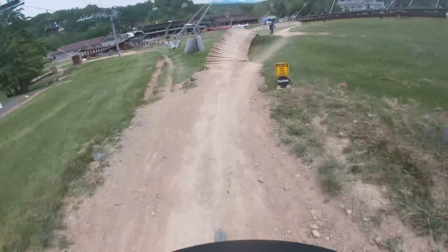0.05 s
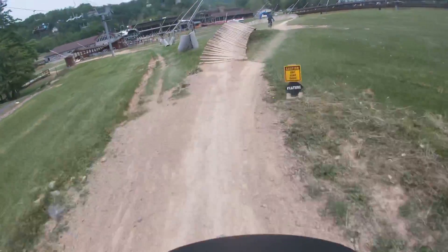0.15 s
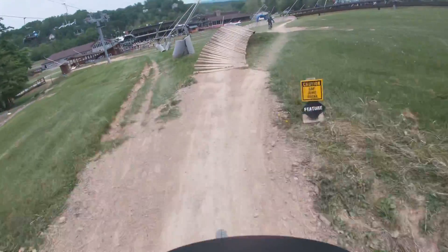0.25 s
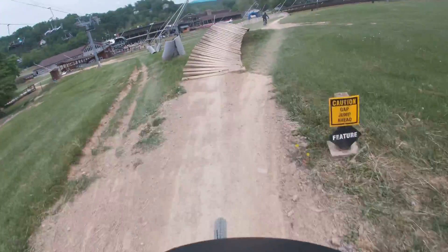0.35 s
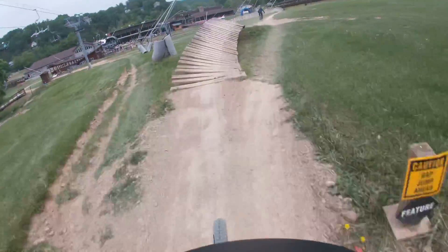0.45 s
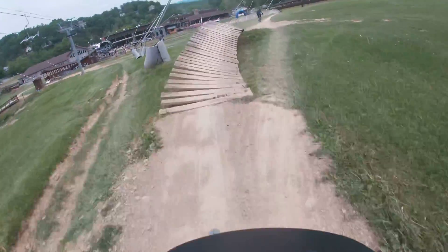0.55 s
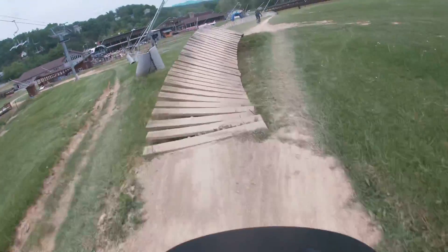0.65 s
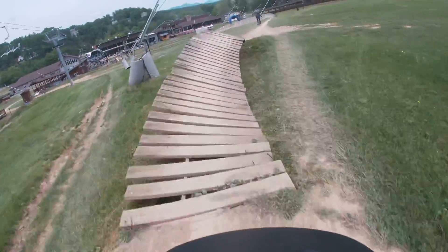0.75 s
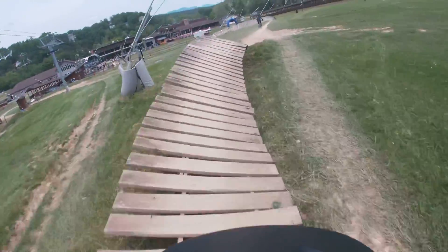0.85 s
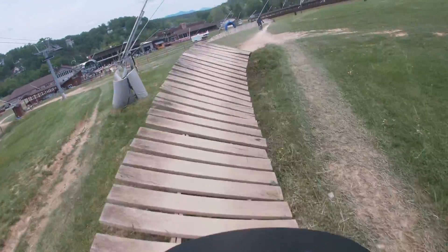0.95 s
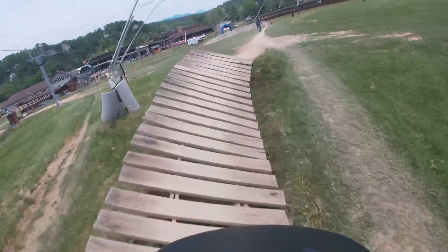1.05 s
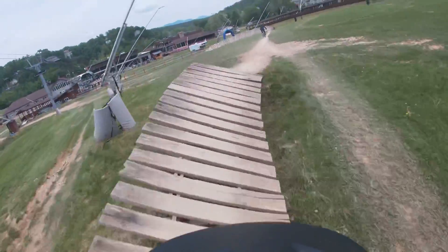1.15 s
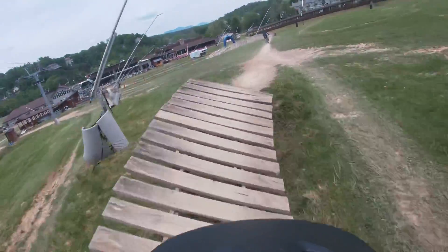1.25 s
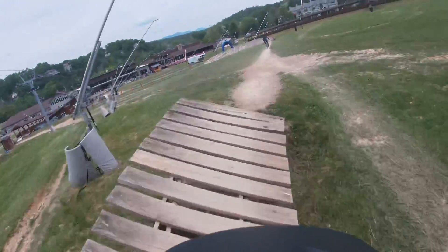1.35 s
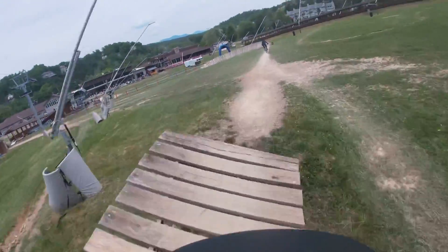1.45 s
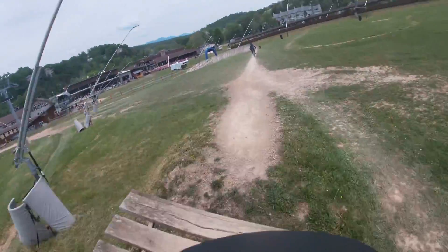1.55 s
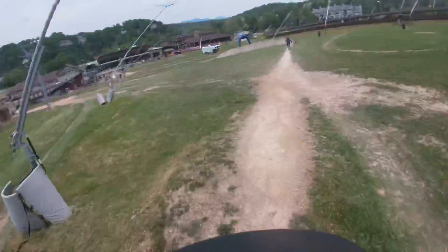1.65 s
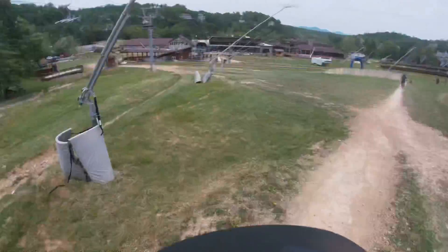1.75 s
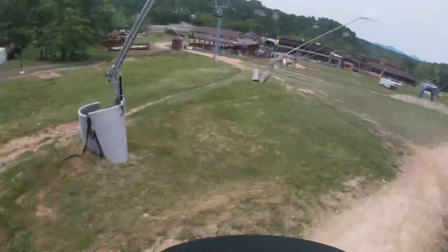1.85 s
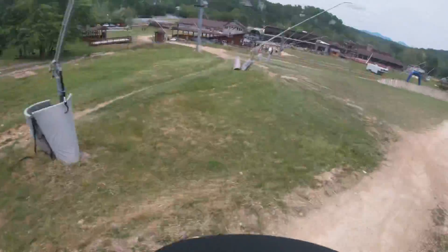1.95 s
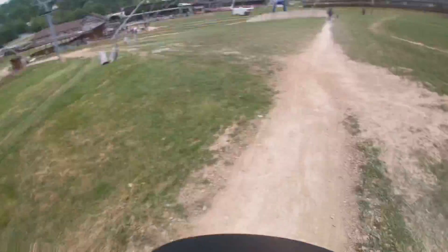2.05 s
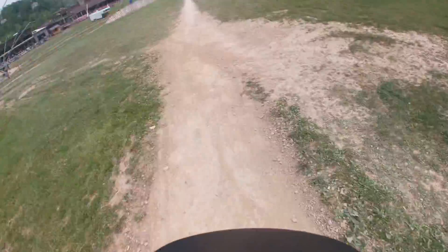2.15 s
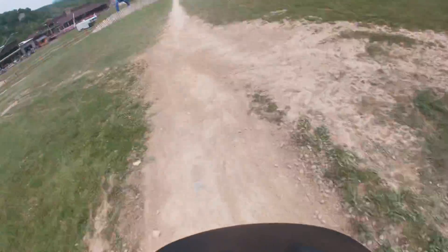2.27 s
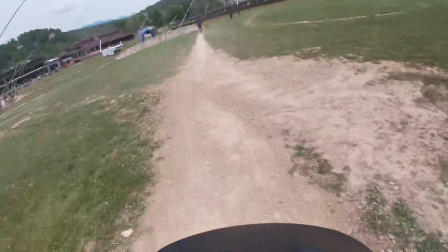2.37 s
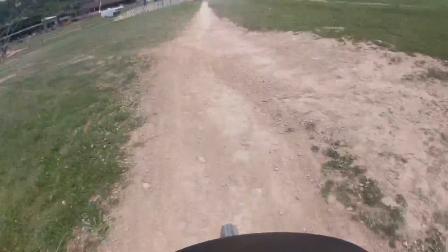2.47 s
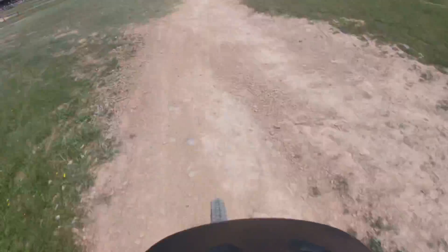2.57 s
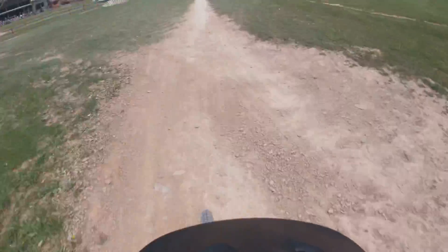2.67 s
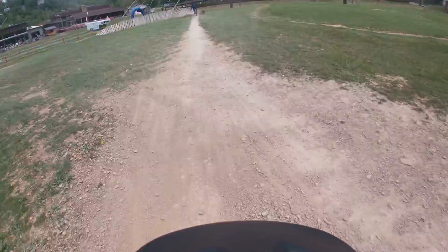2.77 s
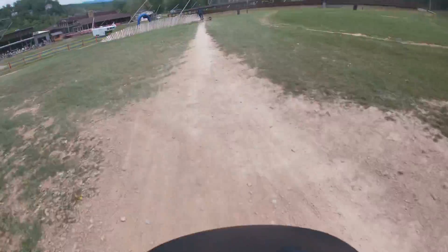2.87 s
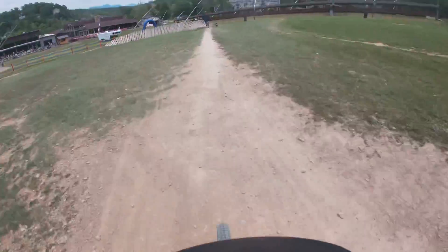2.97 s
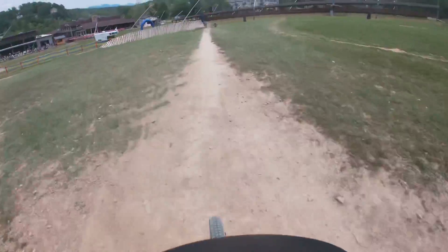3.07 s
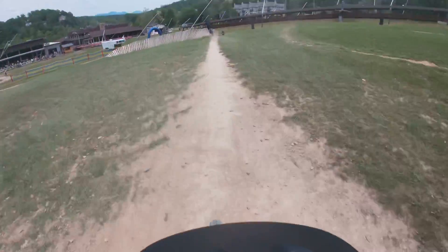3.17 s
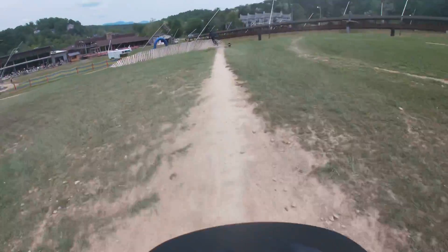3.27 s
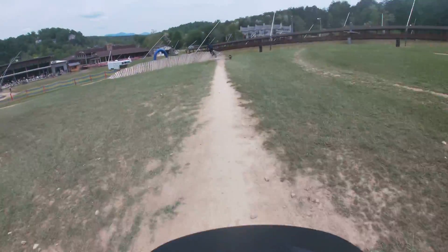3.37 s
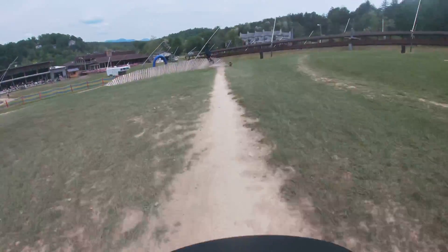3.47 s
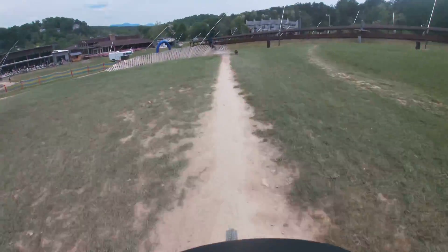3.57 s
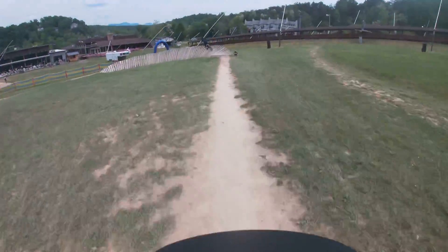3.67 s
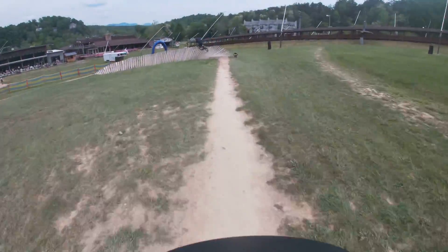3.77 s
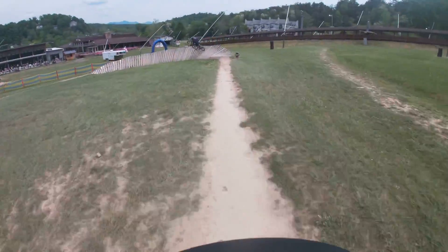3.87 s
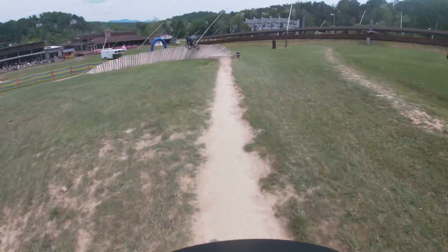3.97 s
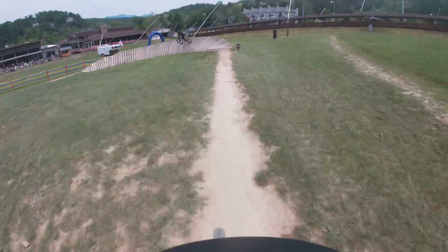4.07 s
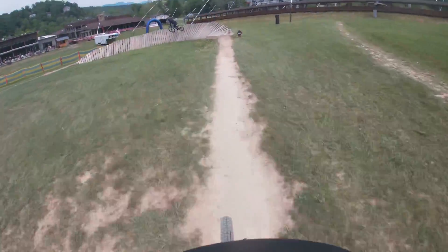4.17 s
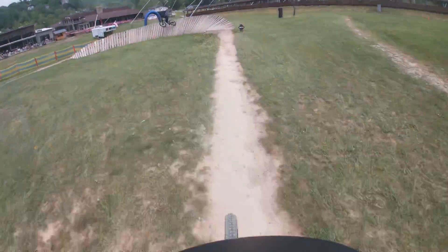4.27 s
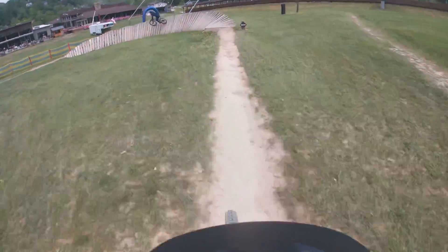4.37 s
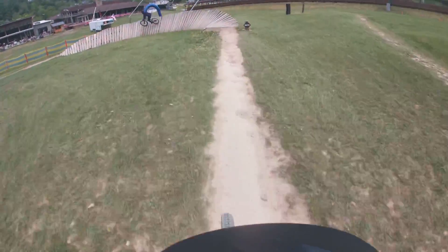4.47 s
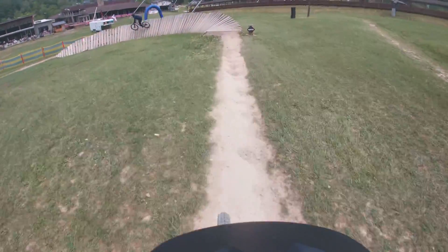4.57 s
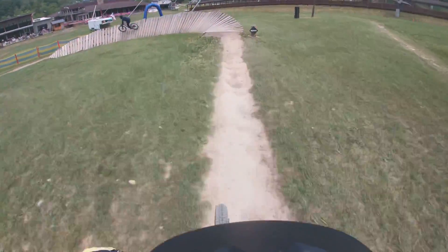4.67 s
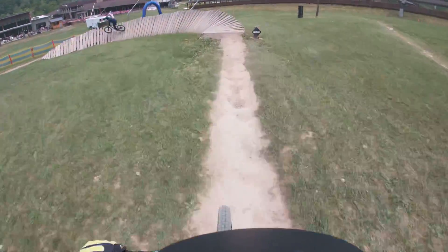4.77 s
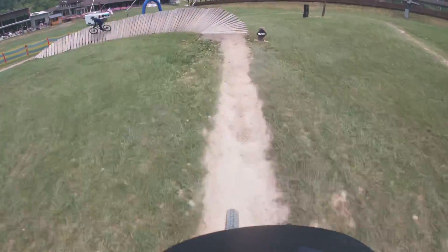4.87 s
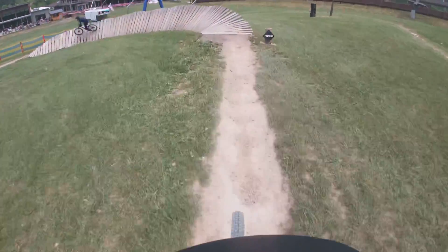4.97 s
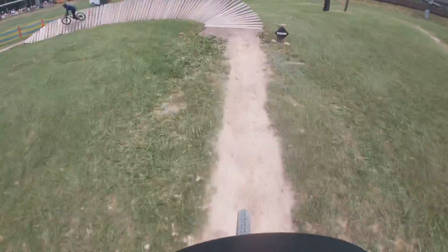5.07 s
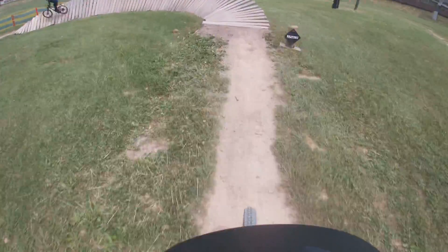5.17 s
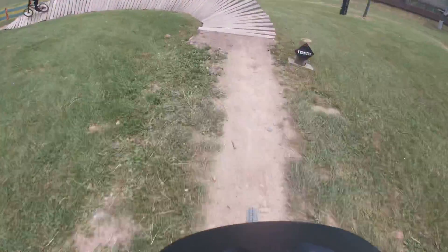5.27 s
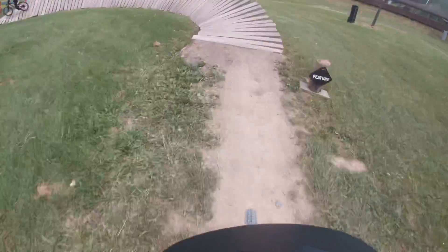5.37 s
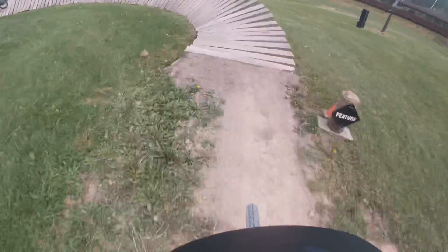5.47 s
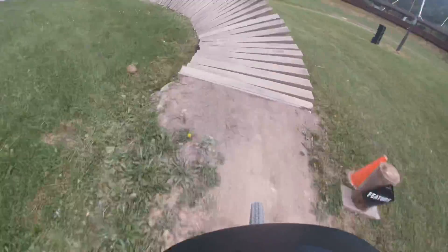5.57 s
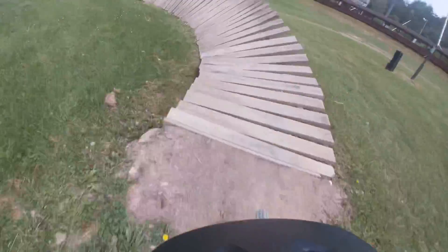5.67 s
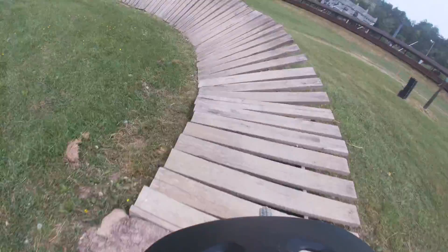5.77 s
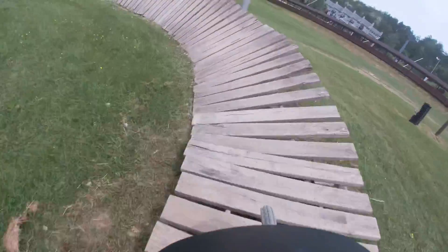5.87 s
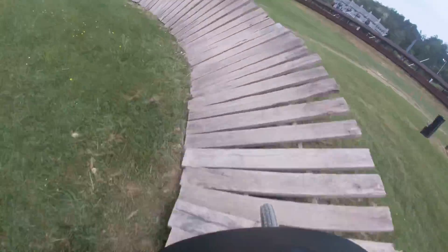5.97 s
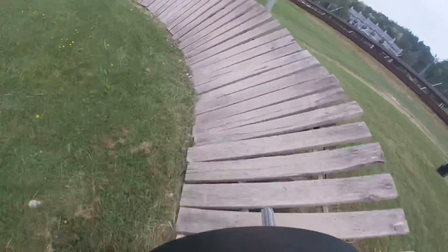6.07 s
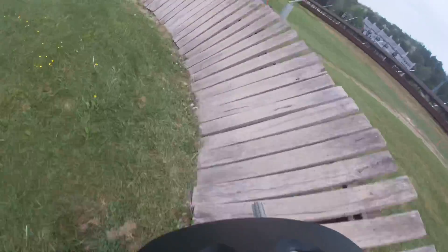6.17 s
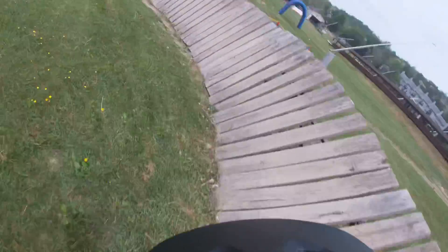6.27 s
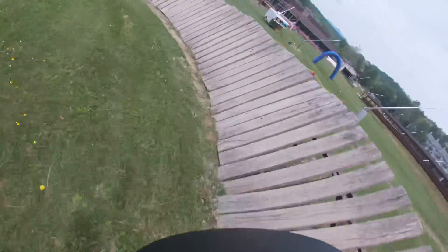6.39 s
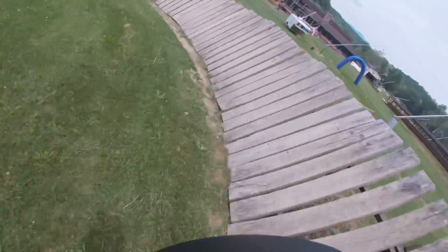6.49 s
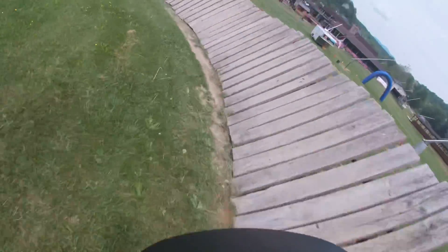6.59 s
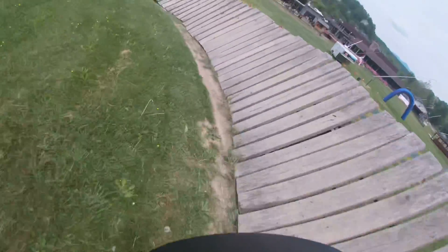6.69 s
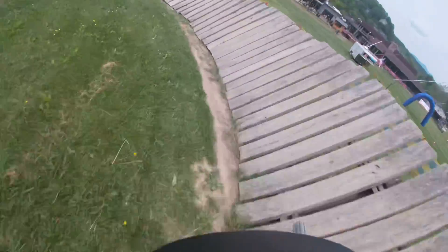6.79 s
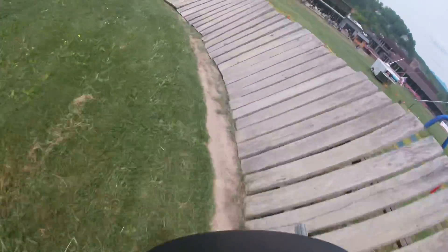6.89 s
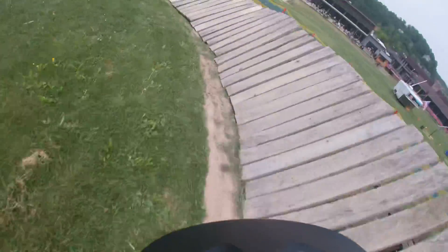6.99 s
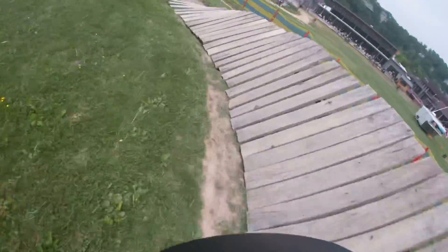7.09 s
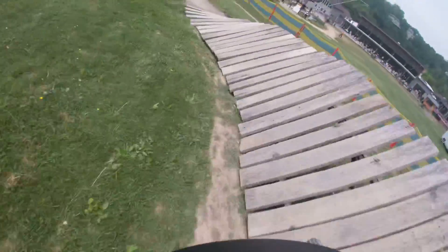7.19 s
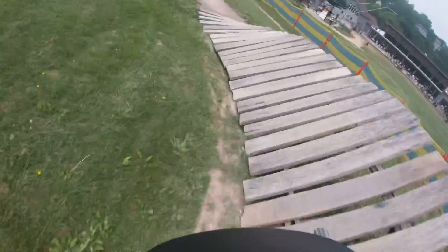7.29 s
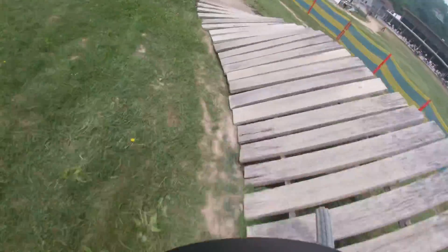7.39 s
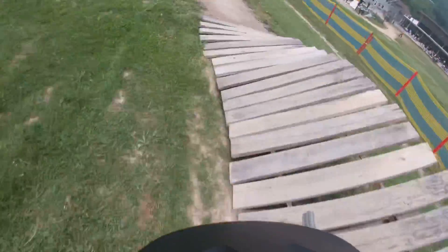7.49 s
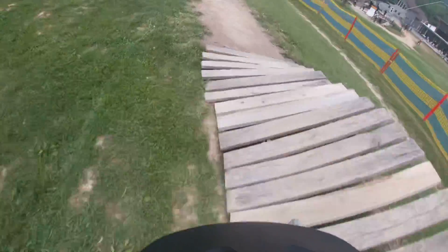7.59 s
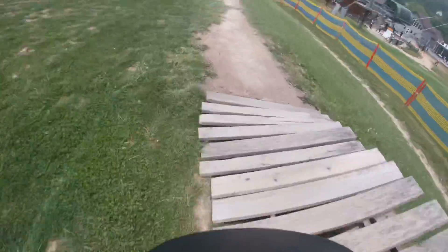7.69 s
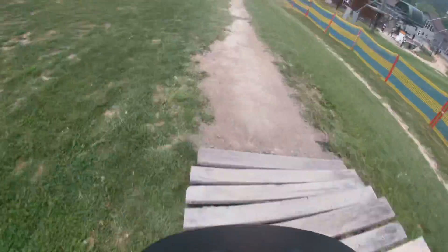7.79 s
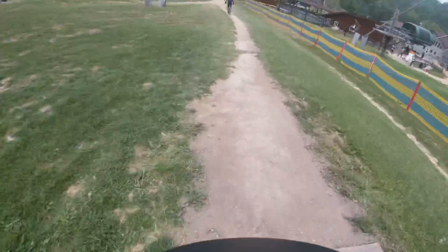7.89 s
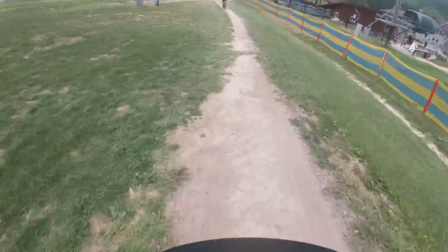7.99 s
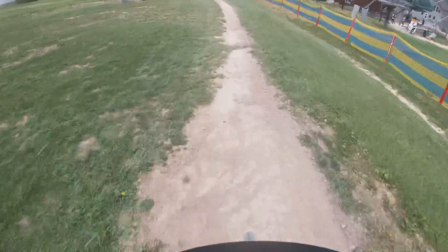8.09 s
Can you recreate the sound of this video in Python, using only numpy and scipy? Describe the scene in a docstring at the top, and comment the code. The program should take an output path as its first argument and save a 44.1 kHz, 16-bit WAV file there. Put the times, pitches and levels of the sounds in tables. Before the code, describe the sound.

A close, muffled microphone in a plastic helmet-camera housing rides downhill outdoors. Deep, lumpy wind and fluttering hiss run throughout. At about 0.3 seconds a hard plastic knock and low thump hit, with a few thin metal tinks around it. Wind and fine chatter continue until 1.55, when a loud crack starts a rough passage: rattling and knocks to 2.0, then a tight burst of clacks, shudders and low wobble from 2.3 to 2.5, and further blows at 2.7 and 2.95. From 3 to 5.8 the ride is smoother, dominated by gusts, strongest around 4.3 to 4.5 and 5.3, with small tinks. A hard knock and heavy gust arrive near 5.9. Board chatter and hollow knocks follow through 6.2 to 7.15, then strong blows at about 7.35, 7.8 and 7.9, wind continuing to the end.

```python
"""A mountain trail of dirt and wooden boards, ridden downhill with a camera on the helmet.
The one microphone sits in the camera's plastic housing. Wind buffets its port as deep noise with
flutter, and hisses as noise through the housing resonances. Trail chatter and hard knocks ring these
resonances with clicks, jolts of the head thump and shudder, and a small loose metal part tinks."""
import sys
import numpy as np
from scipy import signal
from scipy.fft import rfft, irfft, next_fast_len
from scipy.io import wavfile
from scipy.ndimage import uniform_filter1d

SR = 44100
rng = np.random.default_rng(int(sys.argv[2]) if len(sys.argv) > 2 else 0)


def transcribe(signal):
    """Save signal, clipped to [-1, 1], as a 16-bit WAV file at the path in sys.argv[1]."""
    frames = np.atleast_2d(signal).T
    limited = np.clip(frames, -1, 1)
    pcm = np.round(limited * 32767).astype(np.int16)
    wavfile.write(sys.argv[1], SR, pcm)


def volts_from_db(level):
    """Convert decibel levels to linear amplitude ratios."""
    exponent = np.asarray(level, float) / 20
    return 10 ** exponent


N = 358974

# resonances of the plastic housing, widths and levels before each source adapts them:
# pitch_hz, width_hz, level_db
HOUSING = [(435, 68, -18), (852, 258, -4.5), (1054, 204, -6), (1410, 270, 0), (1750, 290, -0.5),
           (1952, 228, -7)]
HOUSING_TREBLE = [(2627, 900, 2.5), (3370, 740, -5.5), (3643, 330, -2.5), (4450, 110, -4.5),
                  (4755, 530, -9.5), (5460, 660, -10), (5850, 190, -13.5)]
# spectrum of the wind flutter, and of the airy top treble: pitch_hz, relative density_db (per Hz)
FLUTTER = [(60, -9.5), (90, 2), (150, 2.5), (200, -5), (280, -28), (400, -37)]
AIR = [(5500, 2), (6800, -10), (8000, -13.5), (10000, -22.5), (14500, -30.5)]


def rms_one(x):
    """Scale to rms 1."""
    return x / np.sqrt(np.mean(x ** 2) + 1e-20)


def in_time(rows):
    """Columns of a curve table, interpolated sample by sample."""
    s, *columns = np.transpose(rows)
    return [np.interp(np.arange(N) / SR, s, column) for column in columns]


def drift(corner_hz):
    """Slow chance of spread 1: noise through two equal low-pass poles, drawn every 40 samples."""
    r = np.exp(-80 * np.pi * corner_hz / SR)
    noise = rng.standard_normal(N // 40 + 2002)
    slow = signal.lfilter([1], [1, -2 * r, r * r], noise)[2000:]   # leaves out the start of the filter
    return np.interp(np.arange(N) / 40, np.arange(len(slow)), rms_one(slow))


def coloured(spectrum):
    """Noise with the given spectrum, rms 1."""
    hz, db = np.transpose(spectrum)
    size = next_fast_len(N)
    log_hz = np.log(np.maximum(np.fft.rfftfreq(size, 1 / SR), 1))
    gain = volts_from_db(np.interp(log_hz, np.log(hz), db, left=-90, right=-120))
    return rms_one(irfft(rfft(rng.standard_normal(size)) * gain, size)[:N])


def evened(x, seconds):
    """Hold down swells slower than the given time, so that they hardly add to the level set elsewhere."""
    return x / np.sqrt(uniform_filter1d(x ** 2, int(seconds * SR)) + 0.52)


def resonance(x, hz, width_hz):
    """Two-pole band-pass, gain 1 on top."""
    r = np.exp(-np.pi * width_hz / SR)
    zeros = np.array([1, 0, -1]) * (1 - r * r) / 2
    poles = [1, -2 * r * np.cos(2 * np.pi * hz / SR), r * r]
    return signal.lfilter(zeros, poles, x + 1e-18)


def ring(clicks, hz, t60_s):
    """A unit click sets a decaying sine of starting height 1 ringing."""
    r = volts_from_db(-60 / (t60_s * SR))
    w = 2 * np.pi * hz / SR
    return signal.lfilter([0, np.sin(w)], [1, -2 * r * np.cos(w), r * r], clicks + 1e-18)


def fading(clicks, t60_s):
    """A unit click starts an envelope at 1 that dies away exponentially."""
    return signal.lfilter([1], [1, -volts_from_db(-60 / (t60_s * SR))], clicks)


def clicks_at(seconds, db):
    """One impulse per event."""
    out = np.zeros(N)
    np.add.at(out, np.round(seconds * SR).astype(int), volts_from_db(db))
    return out


def struck(clicks, hz, width_hz):
    """A soft blow on one housing mode: the ring swells for a millisecond or two, then dies."""
    t60_s = 1.55 * np.log(1000) / (np.pi * width_hz) + 0.0005
    rung = ring(clicks, hz, t60_s)
    return resonance(resonance(rung, hz, 0.88 * width_hz), hz, 3.1 * width_hz)


def buffet():
    """Large eddies press on the port: lumpy deep noise that swells in gusts, with faster flutter above."""
    # steady buffeting, nominal levels: start_s, deep_db, gain_above_40_hz_db, flutter_db
    steady = [(0, -38, 12, -43), (.25, -20.5, 1.5, -39), (.65, -34, 4.5, -38.5), (1.0, -24, -2.5, -38.5),
              (1.55, -25, 7.5, -35), (1.9, -27.5, 0, -33.5), (2.3, -26.5, 10.5, -36.5),
              (2.58, -30, -3.5, -49), (3.1, -37.5, 13, -43), (3.25, -30.5, 19.5, -42.5),
              (3.7, -24.5, 3.5, -41), (4.2, -22, -7, -40.5), (4.65, -25.5, -3, -42.5),
              (5.05, -32.5, -12, -37), (5.3, -31, -11, -43), (5.5, -28.5, 5, -39.5), (6.1, -22, -8, -43),
              (6.7, -23.5, -5, -42), (7.3, -24.5, -3.5, -39), (7.5, -24, -5, -42), (8.14, -23, -13, -43.5)]
    # single big eddies that slam the port: middle_s, length_s (from the middle to 1/e^4 of the power),
    # deep_db (nominal)
    gusts = [(1.05, 0.054, -23.5), (2.741, 0.08, -23), (4.301, 0.035, -17.5), (4.466, 0.16, -15.5),
             (5.283, 0.2, -18.5), (5.946, 0.074, -14), (6.734, 0.19, -23.5), (7.183, 0.064, -18.5),
             (7.375, 0.049, -14.5), (7.934, 0.053, -17)]
    # spectrum of the deep noise: pitch_hz, relative density_db (per Hz)
    rumble = [(12, 6.5), (25, 1), (47, -2), (65, 0.36), (85, -13.5), (120, -44)]
    t = np.arange(N) / SR
    deep_db, upper_db, flutter_db = in_time(steady)
    power = volts_from_db(2 * deep_db)
    for middle_s, length_s, db in gusts:
        power = power + volts_from_db(2 * db) * np.exp(-4 * ((t - middle_s) / length_s) ** 2)
    whole = coloured(rumble)
    upper = signal.sosfiltfilt(signal.butter(2, 40, "high", fs=SR, output="sos"), whole)
    tilted = whole - upper + volts_from_db(upper_db) * upper
    deep = evened(tilted, 0.24) * volts_from_db(2.1 * drift(6.8))
    flutter = rms_one(evened(coloured(FLUTTER), 0.07) * volts_from_db(2.5 * drift(19)))
    return np.sqrt(power) * deep + volts_from_db(flutter_db) * flutter


def roughness_db():
    """Rise in level on the rough patches under the tyres."""
    # rough patches, where the chatter bunches up:
    # middle_s, length_s (from the middle to 1/e^2 of the rise), rise_db
    rough = [(1.739, 0.12, 8.5), (1.984, 0.06, 5.5), (2.314, 0.094, 7.5), (6.327, 0.012, 9),
             (6.443, 0.037, 5.5), (6.7, 0.036, 6.5), (6.888, 0.016, 5), (6.986, 0.024, 11),
             (7.053, 0.028, 9), (7.136, 0.034, 7.5)]
    t = np.arange(N) / SR
    return sum(db * np.exp(-2 * ((t - middle_s) / length_s) ** 2) for middle_s, length_s, db in rough)


def housing_now():
    """The housing resonances, those above 1.6 kHz shifting slowly in level over the ride."""
    # level of these upper resonances: start_s, relative level_db
    upper_level = [(0, 0.5), (2.5, 0.5), (5.8, -0.5), (7.0, -1.5), (8.14, -1.5)]
    upper_db, = in_time(upper_level)
    return [(hz, width_hz, db + upper_db * (hz > 1600)) for hz, width_hz, db in HOUSING]


def rattle(level_db):
    """Trail chatter: many small uneven jolts ring the housing modes, denser and harder on rough ground."""
    rough_db = roughness_db()
    rate = 110 * volts_from_db(4 * drift(4) + rough_db)   # jolts per second
    born = rng.random(N) < rate / SR
    sizes = born * volts_from_db(1.3 * np.minimum(rng.exponential(1, N), 3.5))
    out = 0
    for hz, width_hz, db in housing_now() + HOUSING_TREBLE[:2]:
        mode_db = db - 11.0 * (hz > 2300) + 4.1 * (hz < 600)
        out = out + struck(sizes * rng.standard_normal(N) * volts_from_db(mode_db), hz, width_hz)
    return volts_from_db(level_db + rough_db) * rms_one(out)


def through_housing(modes, gust_db, patchy_db):
    """Turbulence noise excites each resonance, all flickering with the gusts and a little on their own."""
    out = 0
    for hz, width_hz, db in modes:
        band = rng.standard_normal(N)
        for _ in range(2):   # twice, for steep flanks
            band = resonance(band, hz, 1.11 * width_hz)
        out = out + band * volts_from_db(db + gust_db + patchy_db * drift(7.3))
    return rms_one(out)


def rush():
    """Head wind hissing past the housing, raised as a whole by short gusts, with the trail chatter in it."""
    # air rushing past the housing, nominal levels: start_s, hiss_db, treble_db (relative to the hiss)
    rush_level = [(0, -41.5, -9), (.2, -39, -6), (.3, -40, -9), (.61, -41, -10.5), (1.36, -37.5, -9),
                  (1.62, -37, -14.5), (1.66, -36.5, -5), (1.7, -36, -9.5), (1.88, -38.5, -6.5),
                  (2.04, -38, -8.5), (2.075, -33, -6.5), (2.11, -38.5, -11), (2.32, -37, -8),
                  (2.54, -46.5, -13.5), (3.05, -44.5, -10.5), (3.38, -41.5, -11), (3.85, -40.5, -13),
                  (4.69, -43, -11), (4.9, -41, -12), (5.1, -41.5, -13.5), (5.35, -40, -15.5),
                  (5.76, -39, -12.5), (5.96, -39, -16.5), (6.12, -42, -16), (6.46, -38.5, -10),
                  (6.85, -39.5, -14.5), (7.21, -39, -13), (7.43, -44.5, -16), (8.14, -39.5, -14.5)]
    # smooth part of the hiss between the resonances: pitch_hz, relative density_db (per Hz)
    hiss = [(200, 3), (300, -6.5), (550, -11.5), (1200, -11), (2300, -21.5), (4100, -33), (6500, -45)]
    hiss_db, treble_db = in_time(rush_level)
    gust_db = 1.0 * drift(19.0) + 0.5 * drift(57)
    middle = through_housing(housing_now(), gust_db, patchy_db=0.13)
    treble = volts_from_db(treble_db) * through_housing(HOUSING_TREBLE, 1.12 * gust_db, patchy_db=0.5)
    smooth = volts_from_db(-5.5 + 1.2 * gust_db) * coloured(hiss)
    body = volts_from_db(0.42 * roughness_db()) * (middle + smooth) + treble
    # the port passes little above 6.6 kHz
    muffled = signal.sosfilt(signal.butter(6, 6600, fs=SR, output="sos"), body)
    # the airy top follows the treble
    air = volts_from_db(1.03 * treble_db - 22.0 + 1.6 * gust_db) * coloured(AIR)
    return volts_from_db(hiss_db - 0.79) * (muffled + air) + rattle(hiss_db - 11.5)


def tinks():
    """A loose metal part: its main mode near 5.5 kHz always, the others, lower and higher, by where and how
    sharply it is touched."""
    # metal tinks, nominal levels: start_s, peak_db, middle_modes_db and top_modes_db (relative to the peak)
    touches = [(0.2194, -45, -26, -22), (0.3006, -49, -28, -16), (0.3793, -55, -19, -27),
               (0.4723, -63, -9, -29), (0.873, -49, -16, -21), (1.3427, -54, -17, -20),
               (3.9933, -54.5, -21, -26), (4.383, -49, -37, -48), (4.4672, -50, -29, -30.5),
               (4.6307, -49, -22, -33), (5.287, -48, -10.5, -19), (5.3727, -37, -25, -32),
               (5.9313, -55.5, -18, -35), (5.963, -51, -30, -29), (6.1906, -50, -25, -34),
               (6.487, -44, -30, -30), (6.6238, -58, -24, -21), (7.036, -53, -25, -39),
               (7.477, -59, -6.5, -36), (7.5637, -41.5, -23.5, -33), (8.094, -45, -33, -38)]
    # modes of the metal part: pitch_hz, relative level_db, t60_s
    metal = [(5520, 0.5, 0.038), (3770, 8, 0.025), (4660, -0.5, 0.03), (7140, 0, 0.019), (8880, -5, 0.028),
             (10200, -14, .035), (11800, -6, .03), (13160, 4, .025), (13700, -8, .03)]
    s, peak_db, middle_db, top_db = np.transpose(touches)
    spread_db = rng.normal(0, 5.0, (len(s), len(metal)))
    tones = 0
    for k, (hz, db, t60_s) in enumerate(metal):
        upper_db = top_db if hz > 11000 else middle_db
        level_db = peak_db + db + (k > 0) * (upper_db + spread_db[:, k])
        tones = tones + resonance(ring(clicks_at(s, level_db + 1.0), hz, t60_s), hz, 300)
    buzz = volts_from_db(4.0 * drift(150))   # the loose part buzzes as it rings
    # a brief scrape with each touch; spectrum in Hz and relative dB per Hz
    grit = coloured([(3300, -7.0), (4200, 8.5), (7000, 7), (9000, -6.0), (14500, -6.5)])
    scuff = fading(clicks_at(s, peak_db + np.maximum(middle_db, top_db) + 7), 0.061)
    scuff = uniform_filter1d(scuff, int(0.004 * SR))
    return tones * buzz + grit * scuff


def bobbing():
    """After a hard landing the helmet swings on its padding: a low note that swells and dies."""
    # hard landings that leave the helmet bobbing: start_s, level_db (of the push)
    landings = [(0.308, -7), (2.327, -3), (2.453, -6), (2.945, -14)]
    bob_hz, bob_t60_s = 53.2, 0.18
    s, db = np.transpose(landings)
    return resonance(ring(clicks_at(s, db), bob_hz, bob_t60_s), bob_hz, 27)


def jolts():
    """Each jolt of the head pushes the membrane once, then the helmet shudders; hard landings bob it."""
    # jolts of the head, nominal levels: start_s, thump_db, shudder_db (after the thump)
    head_jolts = [(0.3, -1.5, -25), (1.56, -2.5, -29.5), (1.744, -7, -22.5), (2.321, -19, -15),
                  (2.351, -23, -23.5), (2.433, -20, -23.5), (2.7, -35, -32.5), (2.945, -8.5, -40),
                  (5.91, -19, -40.5), (5.961, -12, -30.5), (6.255, -12, -25), (7.29, -12, -28),
                  (7.333, -8, -28.5), (7.817, -7.5, -39)]
    rise_s, fall_s = 0.021, 0.022   # time constants of the shudder
    s, thump_db, shudder_db = np.transpose(head_jolts)
    push = ring(clicks_at(s, thump_db), 103, 0.022)
    thump = signal.sosfilt(signal.butter(2, 180, fs=SR, output="sos"), push)
    age = np.arange(SR // 4) / SR
    shape = (1 - np.exp(-age / rise_s)) * np.exp(-age / fall_s)
    swell = signal.fftconvolve(clicks_at(s, shudder_db), shape / shape.max())[:N]
    return swell * evened(coloured(FLUTTER), 0.04) + thump + bobbing()


def knocks():
    """Bumps knock the housing on its mount: each rings the housing modes, most those near its pitch."""
    # knocks of the housing, nominal levels:
    # start_s, peak_db, strongest pitch_hz, hollow_db and sharp_db (relative to the peak)
    blows = [(0.2943, -9, 1580, -13.5, -27), (1.549, -5, 1780, -16.5, -22), (1.558, -15, 1910, -27, -22),
             (1.574, -37, 1420, -21, -13), (1.6603, -23.5, 1470, -25, -16), (1.7031, -14, 1540, -28, -23),
             (1.768, -29, 1700, -6, -36), (1.776, -25, 1800, -14, -33), (1.84, -23, 1750, -23, -28),
             (1.983, -20, 1700, -28, -29), (2.29, -33, 1750, -22, -32), (2.307, -26, 1410, -20, -33),
             (2.32, -15, 1430, -23, -35), (2.349, -14, 875, -10, -33), (2.359, -8, 1880, -15, -24),
             (2.369, -12, 1800, -18, -34), (2.43, -18, 1840, -26, -35), (2.437, -21, 829, -14, -33),
             (2.462, -10, 1540, -41, -62), (2.696, -23, 1580, -20, -36), (2.6993, -12.5, 1830, -14, -25),
             (2.806, -31, 1500, -18, -29), (2.941, -9.5, 1920, -43, -29.5), (4.629, -28, 1500, -23, -23),
             (5.909, -9, 1500, -23, -36.5), (5.913, -15.5, 1010, -19, -37), (5.962, -26, 1440, 1, -35),
             (6.202, -19.5, 1630, -25, -39), (6.252, -16.5, 880, -1.5, -38), (6.317, -22, 1380, -12, -34),
             (6.715, -24.5, 1390, -8, -34), (6.972, -29, 1500, -13, -32), (7.006, -25, 1000, -9, -28),
             (7.114, -22, 1060, -19, -29), (7.141, -25, 900, -7, -35), (7.268, -23.5, 1020, 1.5, -49),
             (7.289, -21, 996, -9, -31), (7.356, -17, 1700, -12, -35), (7.362, -9, 1510, -24, -50),
             (7.706, -20.5, 1410, -44, -42), (7.816, -18.5, 1450, -10, -43),
             (7.829, -22.5, 1330, -23, -17.5), (7.839, -20, 1460, -20, -37), (7.912, -8.5, 1540, -35, -52),
             (7.951, -31, 1320, -9, -13.5)]
    # crack of the mount under a blow: pitch_hz, width_hz (nominal), relative level_db
    crack = [(2070, 250, 6), (2540, 500, -1), (3210, 880, -3), (3970, 450, -2.5), (4480, 360, -7),
             (5800, 1500, -4.5)]
    # the side to which a blow first throws each housing resonance: sign
    blow_side = [1, 1, -1, -1, -1, 1]
    s, peak_db, pitch_hz, hollow_db, sharp_db = np.transpose(blows)
    modes = HOUSING + crack
    sides = blow_side + [1, -1] * len(crack)
    spread_db = rng.normal(0, 1.5, (len(s), len(modes)))
    # the blow reaches the modes at slightly different times
    lag_s = rng.uniform(0, 0.00006, (len(s), len(modes)))
    out = 0
    for k, (hz, width_hz, db) in enumerate(modes):
        if k == 0:   # the hollow mode, which the head damps under a hard blow
            level_db = hollow_db + 2.0
            width_hz = 3.25 * width_hz
        elif k < len(HOUSING):
            octaves_off = np.abs(np.log2(hz / pitch_hz))
            level_db = db + 3.0 - 13.2 * octaves_off
            width_hz = 1.24 * width_hz
        else:
            level_db = db + sharp_db + 6.5
        clicks = clicks_at(s + lag_s[:, k], peak_db + level_db + spread_db[:, k])
        out = out + sides[k] * struck(clicks, hz, width_hz)
    # a short airy snap just after each blow
    snap = fading(clicks_at(s + 0.00045, peak_db + 1.51 * sharp_db - 1.5), 0.01) * coloured(AIR)
    return out + snap


def scene():
    """All sources reach one microphone."""
    return (buffet() + rush() + tinks() + jolts() + knocks())[None]


def roll_off(x):
    """The treble ends steeply here."""
    return signal.sosfilt(signal.butter(12, 14770, fs=SR, output="sos"), x)


def record(dry):
    """The finished mix as the camera stores it."""
    return roll_off(dry)


dry = scene()
out = record(dry)
transcribe(out)
```